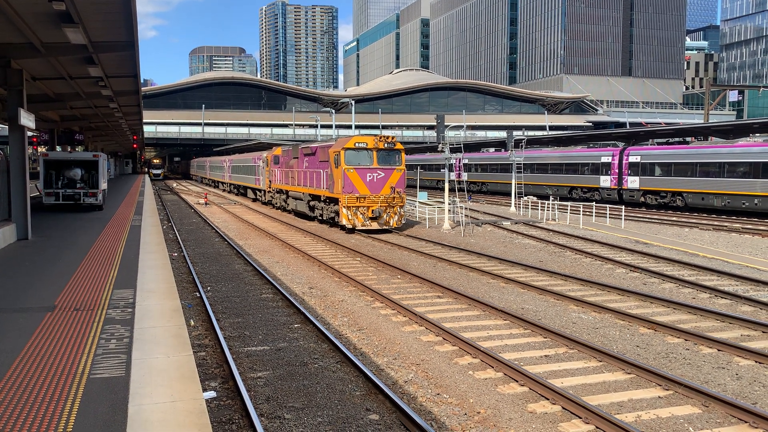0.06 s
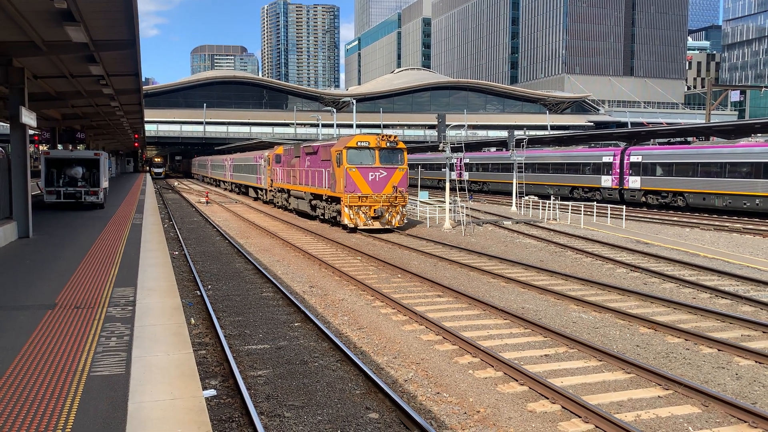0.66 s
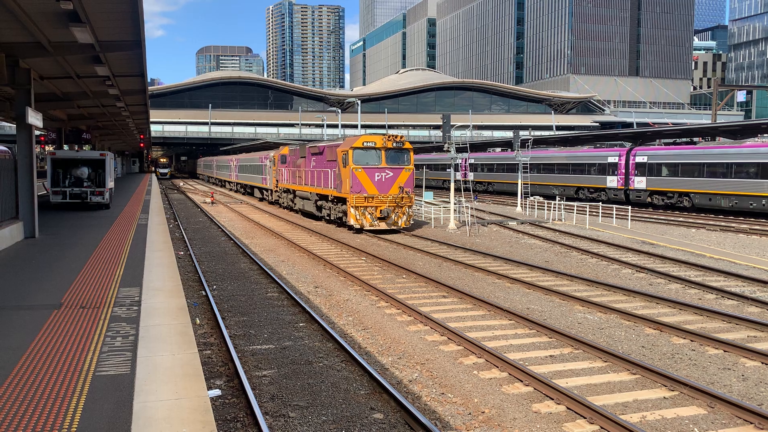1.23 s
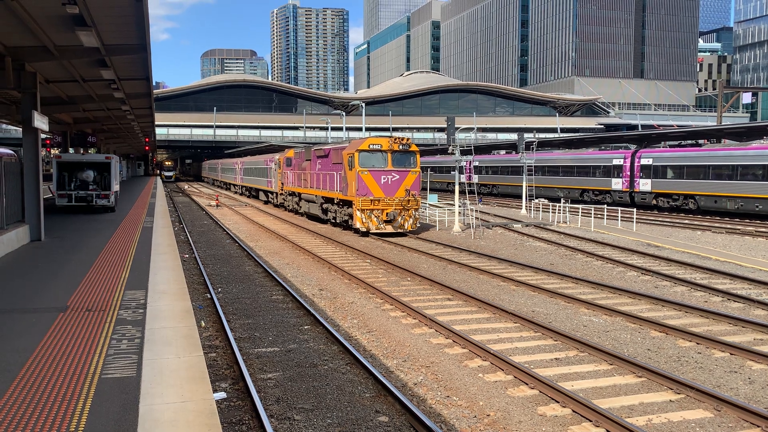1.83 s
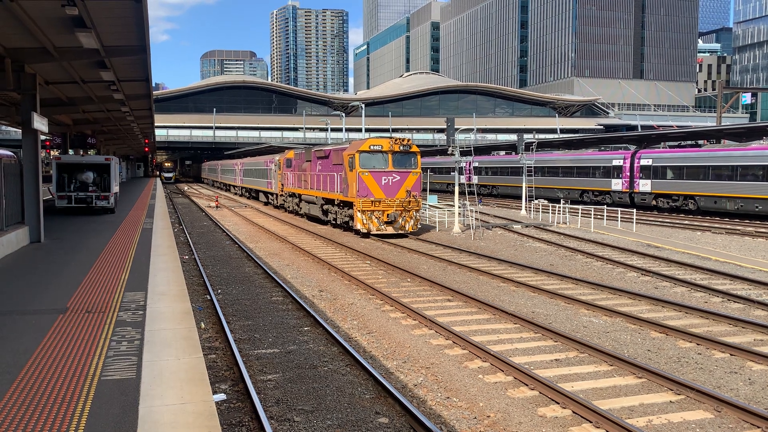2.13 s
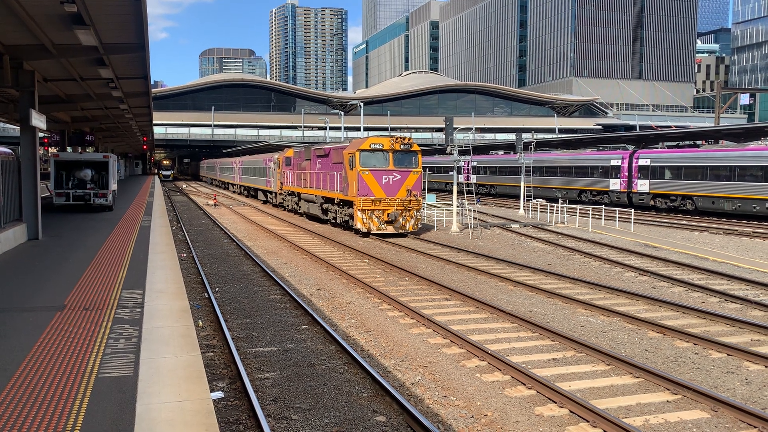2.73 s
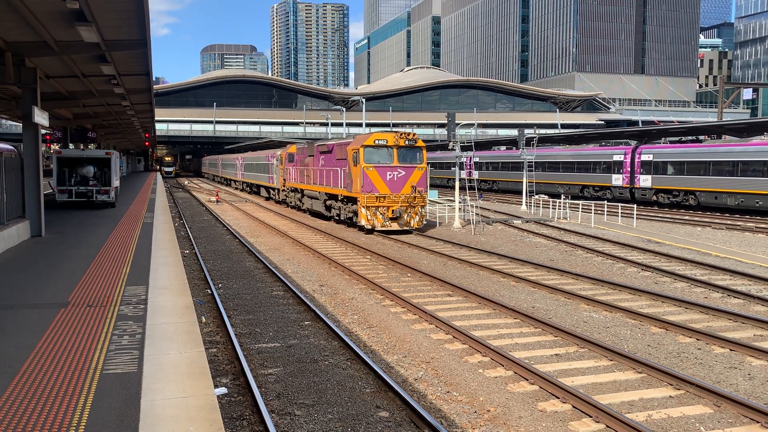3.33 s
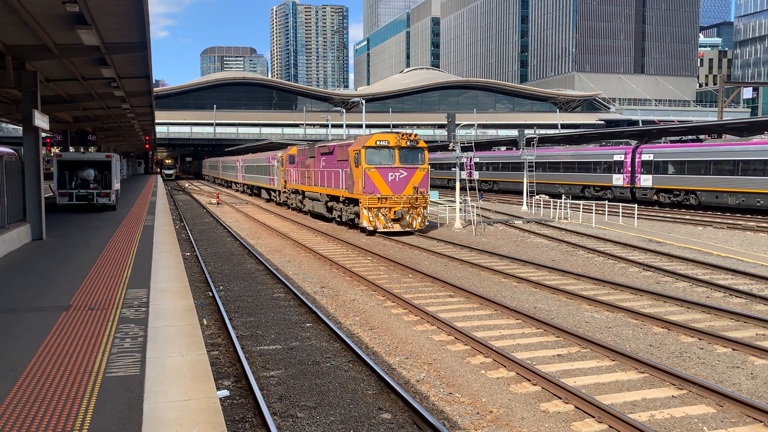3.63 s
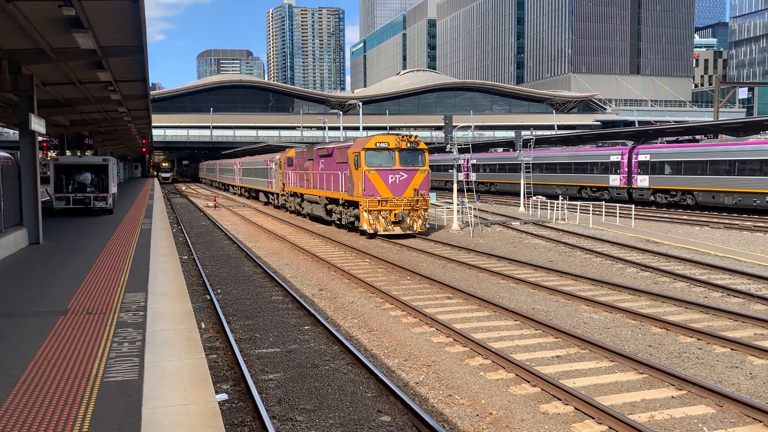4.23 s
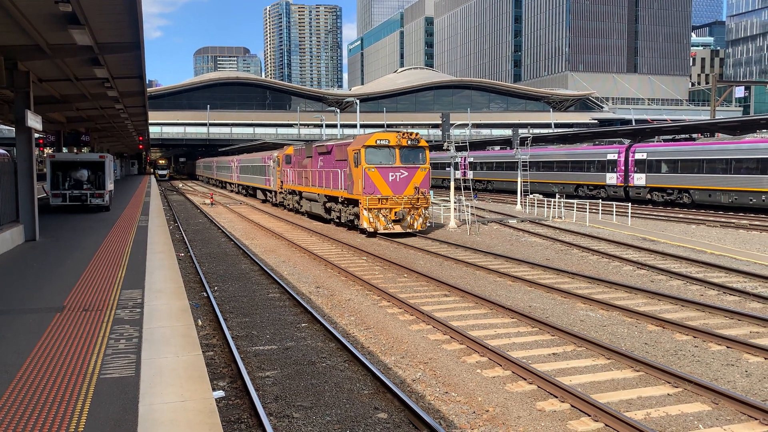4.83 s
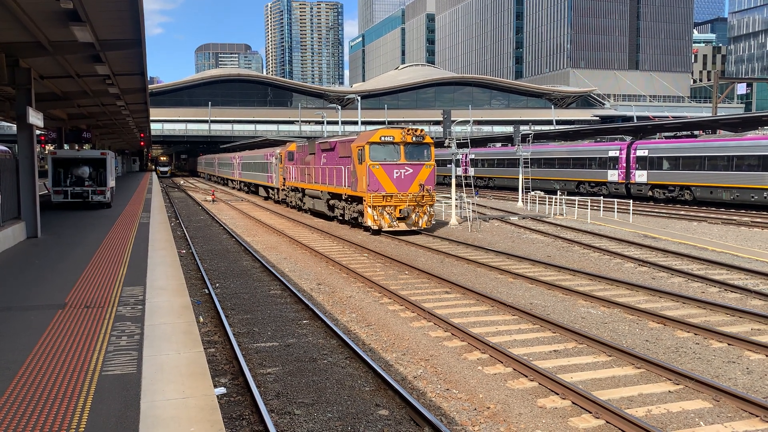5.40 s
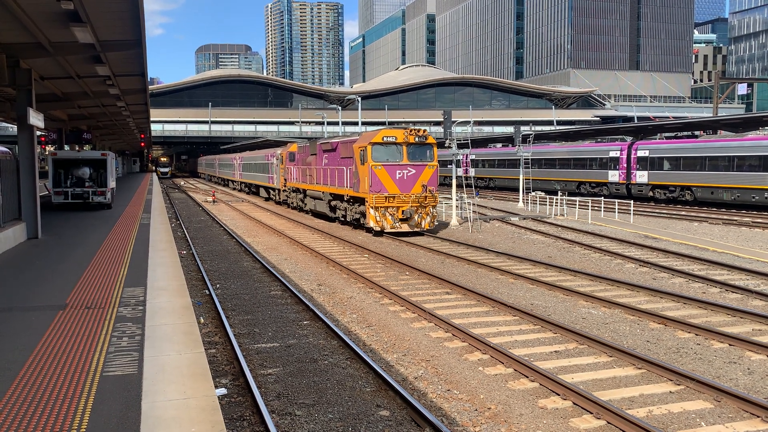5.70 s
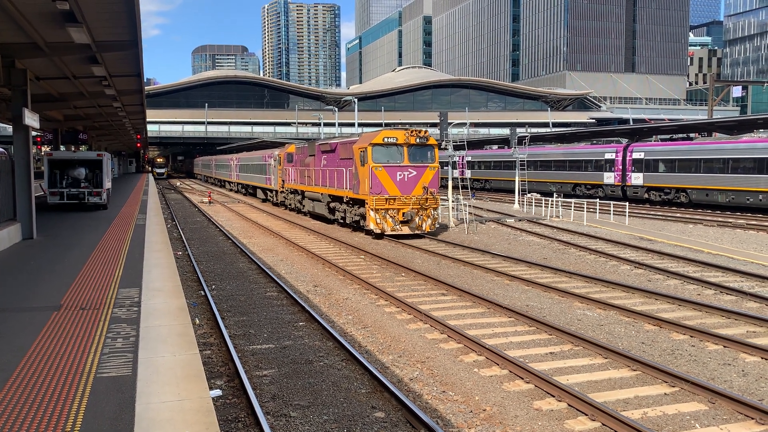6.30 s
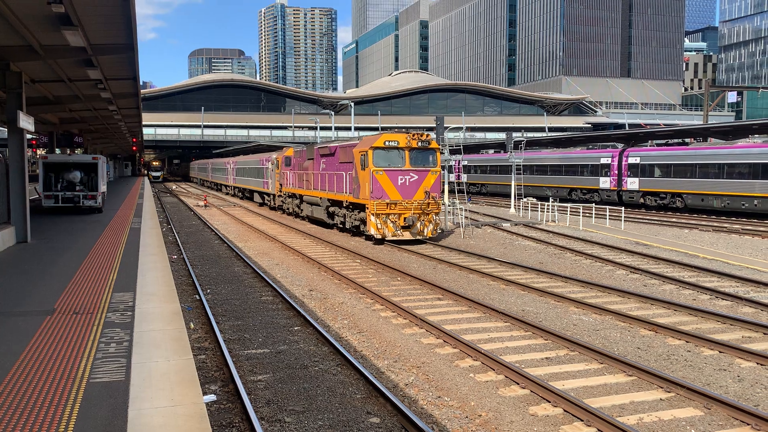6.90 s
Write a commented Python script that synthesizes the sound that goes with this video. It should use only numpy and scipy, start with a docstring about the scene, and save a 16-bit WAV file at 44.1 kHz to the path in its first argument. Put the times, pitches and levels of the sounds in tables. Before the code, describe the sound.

A diesel locomotive creeps along at idle in a big open station, its low throb mixed with a steady generator drone, a machinery roar and a thin whine. After about a second a valve spits and blows off a short hiss of air. A faint metallic squeal passes. Around five seconds the engine revs up, and the throb and whine rise in pitch and grow stronger, scattered by the surrounding buildings.

```python
"""A two-stroke diesel locomotive creeps out of a big open station at idle: its firings throb, its gears and
supercharger whine in step with the crankshaft, and a generator set drones at constant speed. After a second a
valve spits and blows off air; thin tones come and go, a squeal passes, and a fainter spit follows. Around five
seconds the engine is notched up, and the exhaust throb rises in pitch and swells. Throughout, canopies and
buildings scatter the sound."""
import sys
import numpy as np
from scipy import signal
from scipy.fft import rfft, irfft, next_fast_len
from scipy.io import wavfile

SR = 44100
rng = np.random.default_rng(int(sys.argv[2]) if len(sys.argv) > 2 else 0)


def put_to_file(sound):
    """Save the sound as 16-bit audio at rate SR, in the file named by the first command-line argument."""
    columns = np.atleast_2d(sound).T  # one column per channel
    safe = np.clip(columns, -1, 1)
    whole_steps = np.round(safe * 32767)
    wavfile.write(sys.argv[1], SR, whole_steps.astype(np.int16))


N = 315315
TIME = np.arange(N) / SR
IDLE_TURNS_PER_S, NOTCH_TURNS_PER_S, FIRINGS_PER_TURN = 4.955, 6.355, 9


def from_db(db):
    """The decibel law: 20 dB is a factor of ten in amplitude."""
    return 10 ** (np.asarray(db) / 20)

def unit_rms(x):
    """Normalisation to unit mean power."""
    return x / np.sqrt(np.mean(x ** 2) + 1e-20)

def at_hz(points, hz):
    """Interpolation on a logarithmic frequency axis."""
    frequencies, values = np.transpose(points)
    return np.interp(np.log(hz), np.log(frequencies), values)

def envelope(points):
    """Exponential growth and decay: amplitude along straight lines in decibels."""
    return from_db(np.interp(TIME, *np.transpose(points)))

def drift(per_s):
    """Random fluctuation: low-passed noise of spread 1."""
    step = 40  # samples per noise value
    pole = np.exp(-2 * np.pi * per_s * step / SR)
    slow = signal.lfilter([1], [1, -2 * pole, pole ** 2], rng.standard_normal(N // step + 2002))[2000:]
    return np.interp(np.arange(N) / step, np.arange(len(slow)), unit_rms(slow))

# likeness of left and right in the yard: (frequency [Hz], coherence [0-1])
COHERENCE = [(60, .985), (200, .975), (300, .92), (500, .77), (700, .77), (900, .64), (1150, .68),
             (1600, .3), (2700, .28), (3300, .5), (3800, .25), (5300, .42), (5800, .2), (6600, .65),
             (8500, .9)]
# balance: (frequency [Hz], left minus right level [dB])
BALANCE = [(45, -4.5), (85, -3), (200, 1), (500, 0.4), (1050, 1.5), (1600, -0.5), (2900, -0.5),
           (4300, -3.5), (5500, -8.5), (6600, -1), (7500, 0.5)]

def place(mid, side, hz, direct=0):
    """Partial coherence: two independent signals mix to stereo, more alike the more direct the sound."""
    alike = at_hz(COHERENCE, hz)
    alike = np.clip(alike + direct * (1 - alike), 0, .995)
    sign = np.array([[1], [-1]])
    pair = np.sqrt((1 + alike) / 2) * mid + np.sqrt((1 - alike) / 2) * side * sign
    return pair * from_db(sign * at_hz(BALANCE, hz) / 2)

def scattered_tone(cycles, hz, scatter, fades_per_s):
    """Multipath interference: a tone plus its reflections wanders in level and phase; rms about 1."""
    carrier = np.exp(2j * np.pi * cycles)
    pair = []
    for _ in range(2):
        direct = np.exp(2j * np.pi * rng.random())
        reflected = scatter * (drift(fades_per_s) + 1j * drift(fades_per_s))
        pair.append(np.real(carrier * (direct + reflected)))
    return place(*pair, hz, direct=0.14) / np.sqrt(.5 + scatter ** 2)

def shaped_noise(spectrum, direct=0):
    """Spectral shaping: white noise takes a colour and rolls off beyond its ends; stereo, rms 1."""
    size = next_fast_len(N)
    hz = np.maximum(np.arange(size // 2 + 1) * SR / size, 1)
    pair = place(*rfft(rng.standard_normal((2, size))), hz, direct)
    low_hz, high_hz = spectrum[0][0], 1.3 * spectrum[-1][0]
    skirts = 1 / np.sqrt((1 + (low_hz / hz) ** 6) * (1 + (hz / high_hz) ** 8))
    return unit_rms(irfft(pair * from_db(at_hz(spectrum, hz)) * skirts, size)[:, :N])

def ringing(hz, width_hz):
    """Resonance: random forcing excites a narrow band; stereo, rms 1."""
    b, a = signal.iirpeak(hz, hz / width_hz, fs=SR)
    band = signal.lfilter(b, a, rng.standard_normal((2, N)))
    return unit_rms(place(*signal.lfilter(b, a, band), hz))

# far hiss: (frequency [Hz], relative spectral level [dB])
YARD_SPECTRUM = [(1500, 0.5), (4000, 4), (5000, -1.5), (5800, -4.5), (7100, 4.5), (7900, -9.5),
                 (8800, -5.5), (10300, -8.5), (11600, -19.5), (15000, -27)]

def yard_hiss():
    """Stationary noise: a faint, steady hiss from far off."""
    return from_db(-55.5) * shaped_noise(YARD_SPECTRUM)

# thin metallic squeal: (time [s], frequency [Hz], level [dB])
SQUEAL = [(2.33, 1789, -100), (2.48, 1789, -50.2), (3.25, 1789, -49.7), (3.4, 1787, -58), (3.75, 1780, -57),
          (4.03, 1640, -56), (4.25, 1600, -100)]
# faint tones that come and go, with the 392 and 1174 Hz rows the gear whine swelling at idle: (start [s], end
# [s], frequency [Hz], level [dB])
FAINT_TONES = [(0, 1.35, 1174, -50), (0, 2.4, 392, -46.5), (0, 1.1, 2580, -62), (2.5, 3.4, 588, -47),
               (3.6, 3.7, 1480, -51), (5.32, 5.58, 772, -39), (5.7, 7.15, 770, -43.5),
               (5.85, 5.96, 1390, -44), (6.02, 6.3, 1490, -51)]

def thin_tones():
    """Multipath fading: faint tones waver as they come and go; a squeal holds its pitch, then sinks."""
    times, squeal_hz, squeal_db = np.transpose(SQUEAL)
    cycles = np.cumsum(np.interp(TIME, times, squeal_hz)) / SR
    squeal = scattered_tone(cycles, squeal_hz[0], scatter=.4, fades_per_s=7)
    sound = from_db(np.interp(TIME, times, squeal_db)) * squeal
    for start, end, hz, db in FAINT_TONES:
        swell = np.clip(np.minimum(TIME - start, end - TIME) / 0.036 + .5, 0, 1)
        sound += from_db(db) * swell * scattered_tone(hz * TIME, hz, scatter=.5, fades_per_s=12)
    return sound

def burst(start, attack, hold, t60, db):
    """A transient's envelope: a valve opens, stays open and shuts; the sound decays exponentially."""
    age = TIME - start
    decay_db = 60 * np.maximum(age - attack - hold, 0) / t60
    return np.clip(age / attack, 0, 1) * from_db(db - decay_db)

# spits of air: (start [s], attack [s], hold [s], time to fall 60 dB [s], level [dB])
SPITS = [(1.231, .008, .021, .2, -42), (3.28, .006, .015, .15, -65)]
# chirp of the shutting valve: one row with the same columns
CHIRP = (1.25, .007, .005, .11, -49.5)
# blow-off that builds, catches, then bursts out: (time [s], level [dB])
BLOW_OFF_LEVEL = [(1.4, -100), (1.52, -58), (1.58, -45), (1.695, -40.3), (1.725, -48.5), (1.745, -49.5),
                  (1.758, -34.2), (1.8, -34.4), (1.85, -42.3), (1.94, -46.5), (2.02, -57), (2.25, -100)]
# colours of the two jets: (frequency [Hz], relative spectral level [dB])
SPIT_SPECTRUM = [(3000, -13.5), (4300, 2), (5100, -10), (6100, 4), (7300, -3), (8800, 5), (9600, 3.5),
                 (11000, -9), (15500, -13)]
BLOW_OFF_SPECTRUM = [(1200, -6.5), (2400, 8), (3100, 7.5), (4000, 5.5), (4800, -2), (6300, -2.5),
                     (7500, -5.5), (9000, 0), (10000, -1), (11500, -5), (13500, -4.5), (15500, -12.5)]

def air_valve():
    """Jet noise: a spit chirps downward as the valve shuts; a blow-off and a faint spit follow."""
    spits = sum(burst(*row) for row in SPITS) * shaped_noise(SPIT_SPECTRUM, direct=0.5)
    blow_off = envelope(BLOW_OFF_LEVEL) * shaped_noise(BLOW_OFF_SPECTRUM, direct=0.73)
    from_hz, to_hz, glide_s = 5900, 4400, 0.0081
    shutting = np.maximum(TIME - CHIRP[0], 0) / glide_s
    chirp_hz = to_hz + (from_hz - to_hz) * np.exp(-shutting ** 2)
    chirp = burst(*CHIRP) * scattered_tone(np.cumsum(chirp_hz) / SR, to_hz, scatter=.8, fades_per_s=55)
    sputter = from_db(drift(per_s=160))
    return sputter * (spits + blow_off) + chirp

# the generator's weaker lines: (order [multiple of its crank rate], level [dB])
GENERATOR_ORDERS = [(2, -43.5), (3, -39.5), (3.5, -41), (4, -37), (5, -43.5), (8, -40.5)]
# faint steady hums: (frequency [Hz], level [dB])
HUMS = [(128.4, -39.5), (167, -45.5), (179.5, -43), (192.5, -45), (199, -40.5)]
# drone: (time [s], firing note level [dB], fan level [dB])
DRONE_LEVELS = [(0, -26, -30.5), (.9, -30, -30), (1.8, -31, -28.5), (2.55, -28.5, -33), (2.95, -31, -36),
                (3.65, -27.5, -29), (3.95, -31, -30), (5, -29, -28.5), (6.03, -30.5, -42),
                (6.7, -26.5, -32), (7.15, -29.5, -34)]

def generator():
    """Rotation at constant speed: firing note, crank lines and fan hold their pitch as levels wander."""
    firing_hz, fan_hz, firings_per_turn = 112.2, 154.0, 6
    note = scattered_tone(firing_hz * TIME, firing_hz, scatter=0.065, fades_per_s=0.79)
    fan = scattered_tone(fan_hz * TIME, fan_hz, scatter=0.087, fades_per_s=1.4)
    times, note_db, fan_db = np.transpose(DRONE_LEVELS)
    sound = from_db(np.interp(TIME, times, note_db)) * note
    sound += from_db(np.interp(TIME, times, fan_db)) * fan
    lines = [(order * firing_hz / firings_per_turn, db) for order, db in GENERATOR_ORDERS]
    for hz, db in lines + list(HUMS):
        sound += from_db(db) * scattered_tone(hz * TIME, hz, scatter=0.28, fades_per_s=1.0)
    return sound

def crank_tone(order, turns, scatter, fades_per_s):
    """An engine order: a scattered tone at a constant multiple of the crank rate."""
    return scattered_tone(order * turns, order * IDLE_TURNS_PER_S, scatter, fades_per_s)

# direct path and echoes off the buildings: (delay [s], gain [dB])
WHISTLE_PATHS = [(0, 0), (.07, -3), (.16, -5), (.33, -7)]
# whistle that swells and sinks, fainter at speed: (time [s], level [dB])
WHISTLE_LEVEL = [(0, -59.5), (.53, -59.5), (.7, -69), (.87, -61), (1.05, -56.5), (1.2, -63), (1.4, -58),
                 (2, -60), (2.15, -66), (2.3, -61.5), (2.95, -59.5), (3.75, -59.5), (3.88, -52),
                 (3.97, -59.5), (4.1, -58), (4.45, -60), (4.85, -65), (5.1, -64), (5.3, -69), (5.55, -65.5),
                 (6.1, -70), (6.25, -63.5), (6.4, -67), (6.6, -62.5), (6.75, -70), (6.9, -64), (7.15, -69)]

def supercharger(turns):
    """Propagation delay: echoes of the crank-driven whistle trail its rising pitch."""
    whistle = 0
    for delay, db in WHISTLE_PATHS:
        emitted = TIME - delay
        past_turns = np.interp(emitted, TIME, turns) + IDLE_TURNS_PER_S * np.minimum(emitted, 0)
        whistle += from_db(db) * crank_tone(order=844, turns=past_turns, scatter=1.0, fades_per_s=16)
    return envelope(WHISTLE_LEVEL) * whistle

# gear mesh: (order [multiple of the crank rate], level at idle [dB])
GEAR_ORDERS = [(79, -47), (117, -56), (158, -48.5), (237, -58.5), (272, -63), (287, -61), (511, -70),
               (518, -68.5), (524, -67.5), (590, -72)]

def gears(turns, notch, pull):
    """Tooth meshing: the whine follows the crankshaft and is loudest while the engine pulls."""
    notch_db, pull_db = 1.5, 5.5
    whine = sum(from_db(db) * crank_tone(order, turns, scatter=0.82, fades_per_s=8.7)
                for order, db in GEAR_ORDERS)
    return from_db(notch_db * notch + pull_db * pull) * whine

# swells in the roar: (time [s], frequency [Hz], peak level [dB])
SURGES = [(.59, 605, -33.5), (.81, 562, -32.5), (1.5, 580, -35), (2.09, 548, -33), (2.56, 432, -33),
          (2.74, 422, -32), (2.97, 600, -34), (6.06, 465, -27.5), (6.64, 554, -38.5)]

def surges():
    """Narrow-band noise in Gaussian envelopes: the roar wells up briefly, each time at a new pitch."""
    width_s = 0.037
    return sum(from_db(db) * np.exp(-((TIME - s) / width_s) ** 2) * ringing(hz, width_hz=71)
               for s, hz, db in SURGES)

# the roar, and the rasp that joins at speed: (frequency [Hz], relative spectral level [dB])
ROAR_SPECTRUM = [(200, -4), (320, -1), (440, 1.5), (570, 1.5), (720, -4), (950, -6), (1250, -9),
                 (1700, -15), (2000, -18), (3000, -25), (3500, -28), (4100, -30.5), (4700, -42.5),
                 (6000, -54)]
RASP_SPECTRUM = [(2800, -2.5), (3300, 1.5), (4200, -8.5), (5300, -7), (6000, -12.5)]
# hood panel resonances: (frequency [Hz], bandwidth [Hz], level relative to the roar [dB])
PANEL_MODES = [(430, 36, -14), (586.7, 51, -9.5), (1366, 70, -18.5), (2624, 240, -33), (295, 49, -19.5),
               (505, 49, -16), (639.7, 17, -17), (805.5, 55, -16.5), (988, 82, -24.5), (1130, 65, -27),
               (1690, 76, -22.5), (2104, 120, -28)]
# the machinery's roar: (time [s], level [dB])
ROAR_LEVEL = [(0, -31.5), (2.2, -32), (3.1, -31.5), (4.3, -32), (5.1, -31.5), (6, -31.5), (7.15, -31)]

def machinery(turns, notch):
    """Forced vibration: fan and combustion noise rings the hood panels, pulsing per firing and turn."""
    rasp_db, churn_db = -30, 3.1
    roar = shaped_noise(ROAR_SPECTRUM) + from_db(rasp_db) * notch * shaped_noise(RASP_SPECTRUM)
    for hz, width_hz, db in PANEL_MODES:
        roar += from_db(db + churn_db * drift(per_s=9)) * ringing(hz, width_hz)
    depth = np.interp(notch, [0, 1], [.06, .12])
    chug = 1 + depth * np.cos(2 * np.pi * FIRINGS_PER_TURN * turns) + 0.078 * np.cos(2 * np.pi * turns)
    return envelope(ROAR_LEVEL) * chug * roar

# exhaust gas: (frequency [Hz], relative spectral level [dB])
RUMBLE_SPECTRUM = [(22, -32), (32, -11), (45, -7.5), (65, -5), (95, -1), (140, -7.5), (190, -6), (250, -7),
                   (330, -15), (600, -39)]

def exhaust_rumble(turns):
    """Amplitude modulation: gas rumbles out with each puff."""
    puffs = 1 + 0.17 * np.cos(2 * np.pi * FIRINGS_PER_TURN * turns)
    return from_db(-28) * puffs * shaped_noise(RUMBLE_SPECTRUM)

# brief drops of the throb during the run-up: (time [s], depth [dB])
THROB_DIPS = [(4.63, 5.2), (5.01, 7.6), (5.38, 5.1), (6.37, 2)]
# lines relative to the idling throb: (order [per turn], level at idle [dB], level at the notch [dB])
EXHAUST_ORDERS = [(7, -34.5, -13), (8, -25, -17.5), (10, -16.5, -19.5), (11, -17, -21), (14, -30, -15.5),
                  (15, -26, -15.5), (16, -15.5, -10.5), (18, -13, -20.5), (19, -17, -23), (20, -15, -20.5),
                  (22, -26, -25.5), (26, -26.5, -16.5), (31, -24, -17), (37, -23.5, -16)]

def exhaust_throb(turns, speed, notch, pull):
    """Periodic excitation: the firings make one strong line, unequal cylinders weaker ones beside it."""
    throb_db, approach_db_per_s, notch_db, pull_db = -23.6, 0.99, -0.6, 2
    growth_db = approach_db_per_s * TIME + notch_db * notch + pull_db * pull
    # the exhaust booms as the firing rate passes through a resonance
    boom_hz, half_width_hz, peak_db = 54.6, 2.6, 3.5
    boom_db = peak_db / (1 + ((FIRINGS_PER_TURN * speed - boom_hz) / half_width_hz) ** 2)
    dip_db = sum(depth * np.exp(-((TIME - s) / 0.03) ** 2) for s, depth in THROB_DIPS)
    # a weak cylinder makes the throb sag once a turn
    lope_depth, at_turn, width = np.interp(notch, [0, 1], [.42, .22]), .25, .38
    lope = 1 - lope_depth * np.exp(-(np.sin(np.pi * (turns - at_turn)) / width) ** 2)
    firing = crank_tone(FIRINGS_PER_TURN, turns, scatter=0.057, fades_per_s=5.7)
    sound = from_db(growth_db + boom_db - dip_db) * lope * firing
    for order, idle_db, fast_db in EXHAUST_ORDERS:
        line = crank_tone(order, turns, scatter=0.35, fades_per_s=0.86)
        sound += from_db(idle_db + (fast_db - idle_db) * notch) * line
    return from_db(throb_db) * sound

def scene():
    """Superposition: the sources add while the governor takes the engine from idle to the next notch."""
    middle_s, ease_s = 5.17, .447
    notch = 1 / (1 + np.exp((middle_s - TIME) / ease_s))  # 0 at idle, 1 at the higher notch
    pull = 4 * notch * (1 - notch)  # the engine pulls hardest halfway
    speed = IDLE_TURNS_PER_S + (NOTCH_TURNS_PER_S - IDLE_TURNS_PER_S) * notch
    hunting = 1 + .001 * drift(per_s=4)
    turns = np.cumsum(speed * hunting) / SR
    engine = exhaust_throb(turns, speed, notch, pull) + exhaust_rumble(turns)
    engine += machinery(turns, notch) + surges()
    engine += gears(turns, notch, pull) + supercharger(turns)
    return engine + yard_hiss() + generator() + thin_tones() + air_valve()

# the microphone's two ports: (frequency [Hz], phase lead of left over right [rad])
PORT_PHASE = [(50, 0), (200, .28), (500, .45), (700, 1.35), (1000, 1.5), (1400, 2.3), (1900, 4.3),
              (2300, 5.1), (2850, 3), (3500, 2.9), (4250, .6), (5400, 2.3), (6000, -.3), (6600, -.5),
              (7300, -1.5), (7900, -3), (8900, -3.3), (10300, -6.2), (11700, -6.4), (12600, -9.2),
              (14000, -9.6), (15000, -11.5)]

def record(dry):
    """Phase shift and band limiting: the ports turn the phase and drop deep bass; the top is cut."""
    low_cut_hz, stopband_hz = 27, 16500
    size = next_fast_len(N + SR // 10)
    hz = np.maximum(np.arange(size // 2 + 1) * SR / size, 1)
    left = irfft(rfft(dry[0], size) * np.exp(1j * at_hz(PORT_PHASE, hz)), size)[:N]
    high_pass = signal.butter(4, low_cut_hz, "high", fs=SR, output="sos")
    low_pass = signal.cheby2(12, 70, stopband_hz, fs=SR, output="sos")
    return signal.sosfilt(low_pass, signal.sosfilt(high_pass, np.array([left, dry[1]])))


dry = scene()
out = record(dry)
put_to_file(out)
```